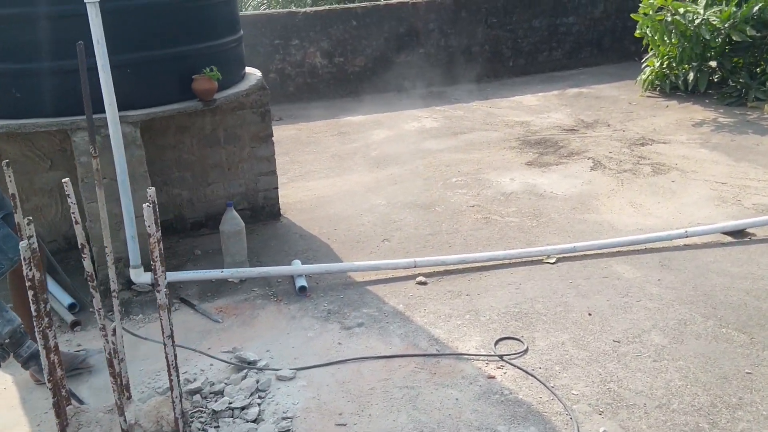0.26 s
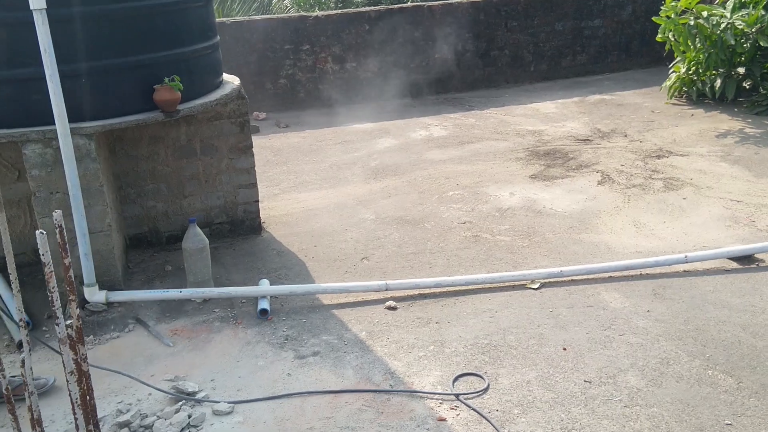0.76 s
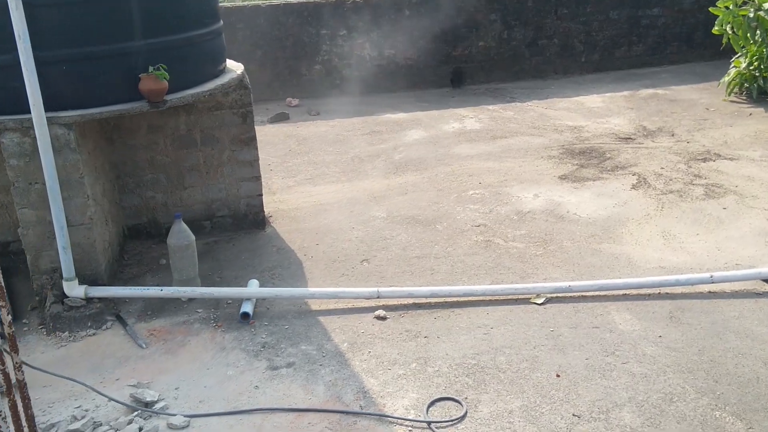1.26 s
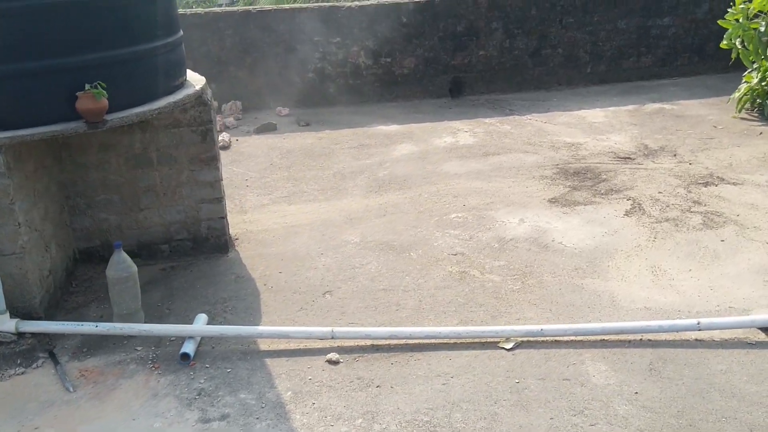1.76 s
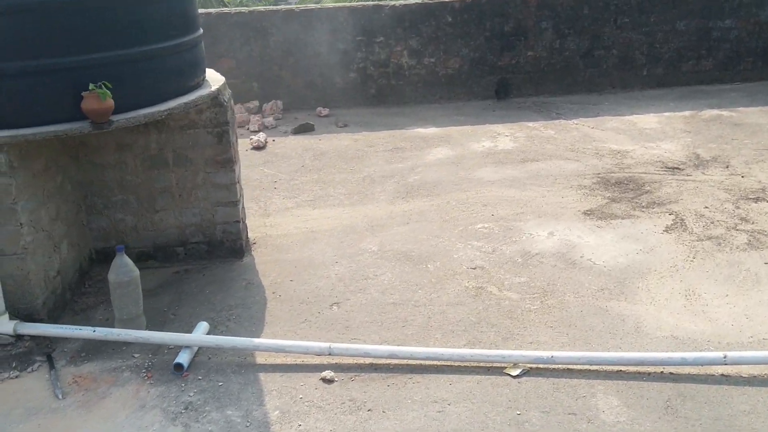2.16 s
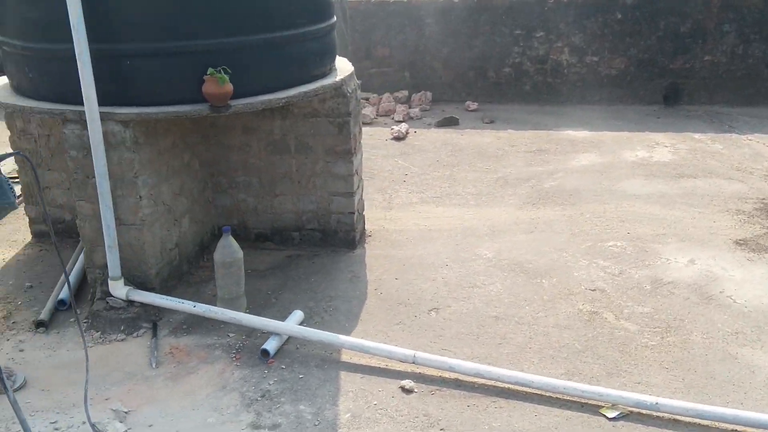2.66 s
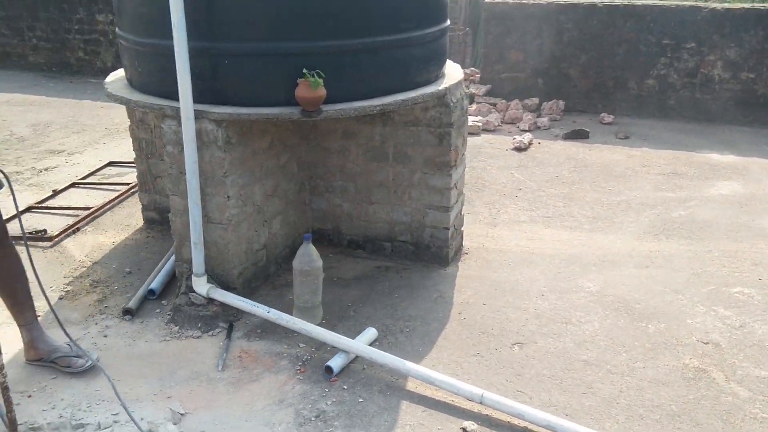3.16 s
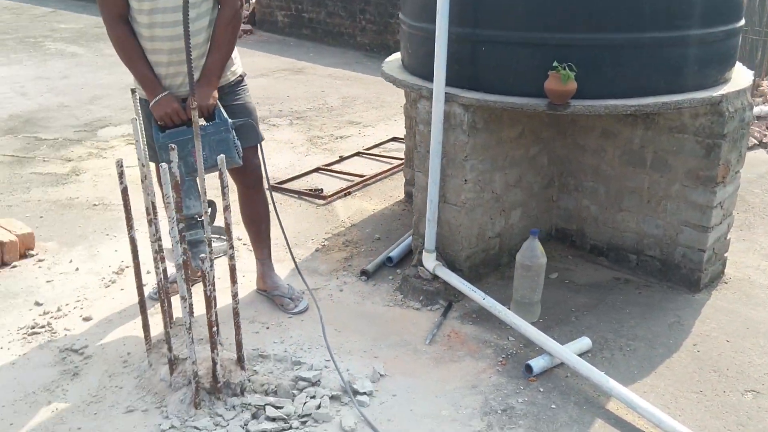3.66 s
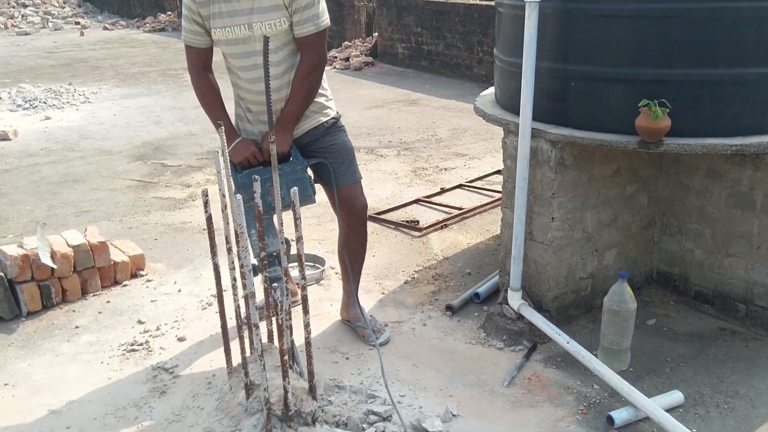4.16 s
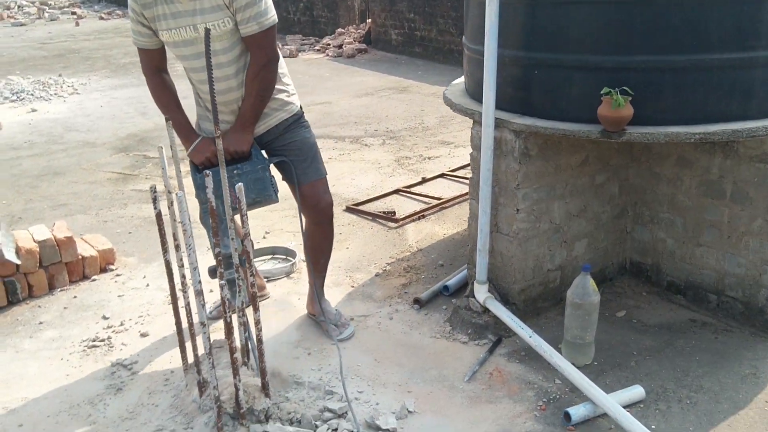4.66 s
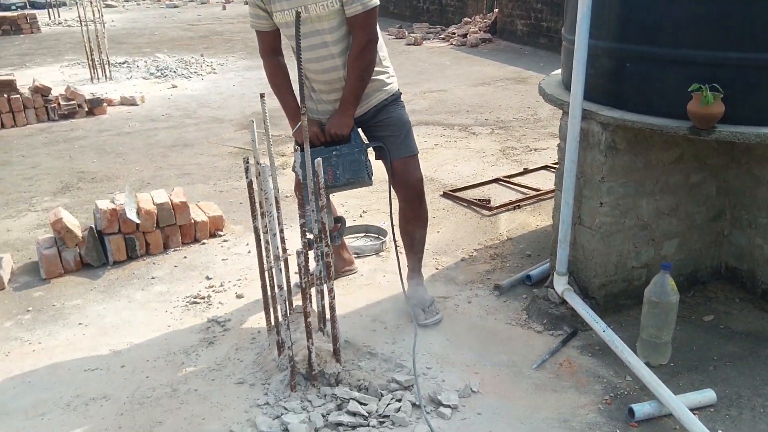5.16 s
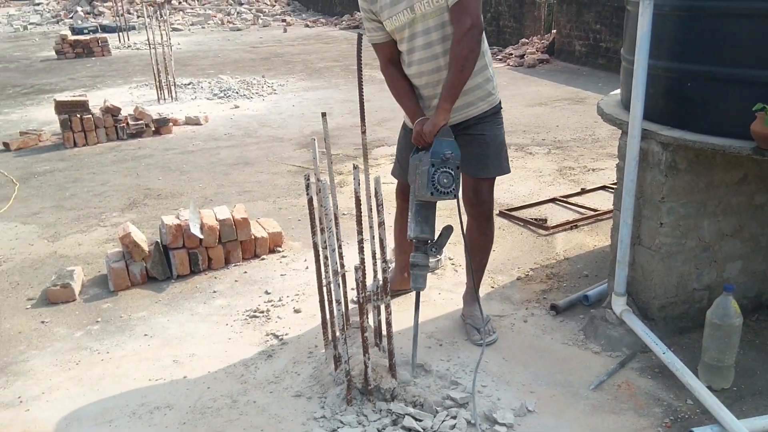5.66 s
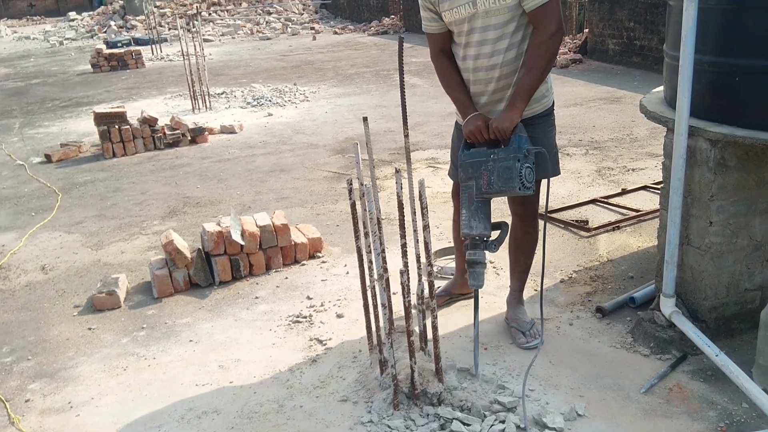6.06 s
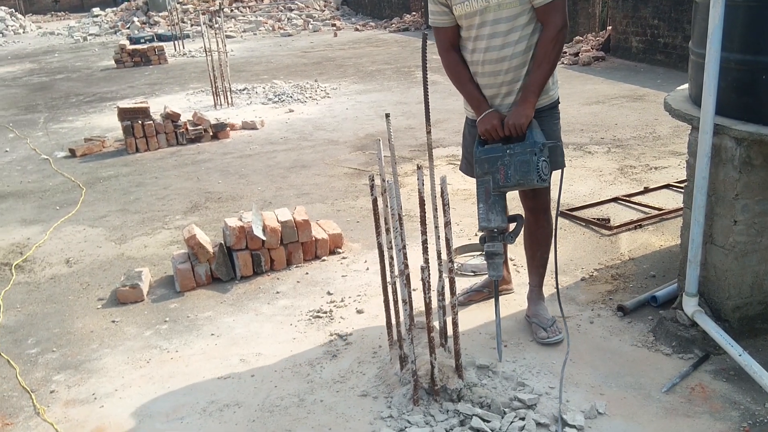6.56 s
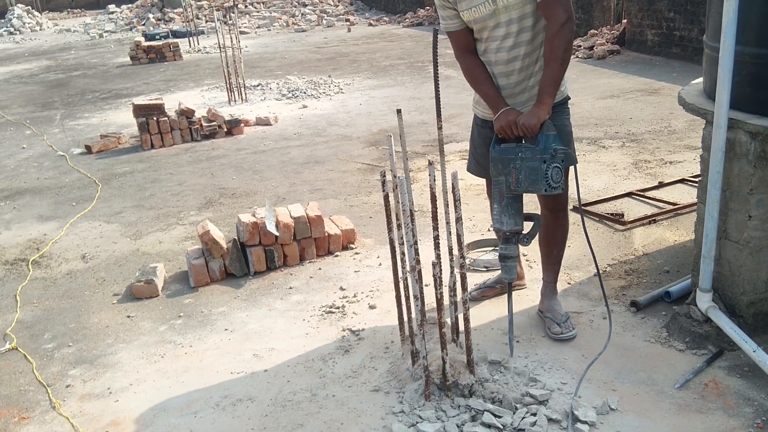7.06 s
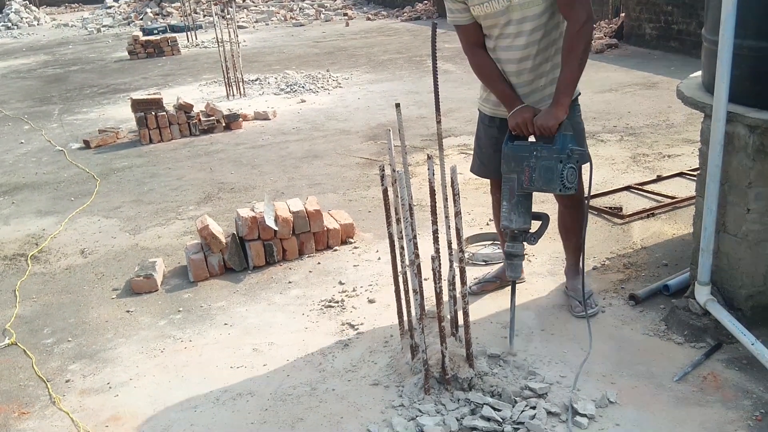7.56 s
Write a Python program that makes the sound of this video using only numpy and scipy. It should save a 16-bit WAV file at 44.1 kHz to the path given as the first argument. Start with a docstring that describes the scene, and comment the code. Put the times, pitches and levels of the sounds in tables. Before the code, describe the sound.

From 0 to 0.5 seconds an electric breaker runs unloaded on an open concrete roof: rough motor roar, gear chatter and wavering whine. At about 0.54 it starts pounding, roughly 31 blows a second, a loud, bright steel clatter with piercing chisel ring and low slab shudder. The texture shifts as the chisel bites or floats, some blows hard and dry, others soft with freer ringing, around 2.6 and 3.6 especially. Nearby surfaces add short, hard reflections. From about 4.5 the motor coasts: the gear whine sinks in pulses, blows slow and separate. By 6 they are distinct duller clacks with quick rebounds, and roar fades away. Short groans sink between 6.2 and 7.2 as knocks grow sparse. A low wind puff passes just after 7, a weak clack with a tiny rattle falls at 7.4, and a faint rough squeaky knock ends it at 7.8, over quiet distant site noise.

```python
"""Electric breaker on a concrete roof, switched off

A geared crank drives a striker against a steel chisel about 31 times a second, over motor roar and a shaking slab.
The motor coasts down: gear whine sinks through the housing resonances, blows thin out, slow teeth make it groan.
Noise, tuned resonances and decaying tones make the layers, over site noise; a puff of wind and a squeaky blow end it.
A parapet and a tank throw the machine's sound back, and the loudest peaks are squashed."""
import sys
import numpy as np
from scipy import signal
from scipy.fft import rfft, irfft, next_fast_len
from scipy.io import wavfile
from scipy.ndimage import uniform_filter1d

SR = 44100
rng = np.random.default_rng(int(sys.argv[2]) if len(sys.argv) > 2 else 0)


def generate_wav(signal):
    """Clip the signal to [-1, 1] and save it as 16-bit WAV at the path in sys.argv[1]."""
    frames = np.transpose(np.atleast_2d(signal))
    scaled = np.clip(frames, -1, 1) * 32767
    pcm = np.round(scaled).astype(np.int16)
    wavfile.write(sys.argv[1], SR, pcm)


N = 344421
PADDED = N + 4096  # room for filter tails
TIME, HZ = np.arange(N) / SR, np.fft.rfftfreq(PADDED, 1 / SR)
TURNS_PER_S, COAST_S, TEETH = 31, 4.54, 60  # nominal full speed, start of the coast, teeth per turn


def gain_of(db):
    """Decibels to an amplitude factor."""
    return 10 ** (np.asarray(db) / 20)


def read(points):
    """A spectrum table on the frequency axis, joined along log frequency."""
    hz, value = np.transpose(points)
    return np.interp(np.log(HZ + 1), np.log(hz + 1), value)


def coloured(x, points):
    """Filters by a spectrum whose mean power gain is one."""
    gain = gain_of(read(points))
    return irfft(rfft(x, PADDED) * gain / np.sqrt(np.mean(gain ** 2)), PADDED)[:N]


def resonance(x, hz, width):
    """Two-pole resonance of peak gain one."""
    return signal.lfilter(*signal.iirpeak(hz, hz / width, SR), x)


def band(x, low_hz, high_hz, order):
    """Butterworth band-pass."""
    return signal.sosfilt(signal.butter(order, [low_hz, high_hz], "band", fs=SR, output="sos"), x)


def smooth_noise(samples):
    """White noise averaged over a run of samples: a slow random wander."""
    return uniform_filter1d(rng.standard_normal(N), size=samples)


def smooth_patches(shape, bins, frames):
    """Random patches over time and frequency."""
    across = uniform_filter1d(rng.standard_normal(shape), size=bins, axis=0)
    return uniform_filter1d(across, size=frames, axis=1)


def patchy(x, spread_db, frames):
    """Colours a sound with drifting patches about 700 Hz wide."""
    z = signal.stft(x, SR, nperseg=256)[2]
    patches = smooth_patches(z.shape, 4, frames)
    gain = gain_of(spread_db * patches / patches.std())
    return signal.istft(z * gain / np.sqrt(np.mean(gain ** 2)), SR, nperseg=256)[1][:N]


def clicks(rows):
    """One impulse for each row, placed by its time in seconds and scaled by its level in dB."""
    rows, out = np.array(rows), np.zeros(N)
    np.add.at(out, np.round(rows[:, 0] * SR).astype(int), gain_of(rows[:, 1]))
    return out


def dying(x, t60):
    """Each impulse becomes a step that dies away by 60 dB in t60 seconds."""
    return signal.lfilter([1], [1, -1000 ** (-1 / (t60 * SR))], x)


def fuzzy(hz, width):
    """A wavering tone of rms one: noise through the same resonance twice."""
    x = resonance(resonance(rng.standard_normal(N), hz, width), hz, width)
    return x / x.std()


def fuzzy_phasor(hz, width):
    """A wavering tone as a complex signal, ready to be shifted in pitch."""
    return signal.hilbert(fuzzy(hz, width), next_fast_len(N))[:N]


def tones(rows, width, fall):
    """Short swelling tones that sink through their listed pitch by fall Hz a second."""
    out = 0
    for start, length, hz, db in rows:
        t = np.clip(TIME - start, 0, length)
        bend = np.exp(-1j * np.pi * fall * (t - length / 2) ** 2)
        swell = np.sin(np.pi * t / length)
        out = out + gain_of(db - 2.0) * swell * (fuzzy_phasor(hz, width) * bend).real
    return out


# The machine's fader moves. Each row: time in seconds, motor roar, gear whine and slab thud in relative dB,
# share of the gear load that comes from compressing air (0-1).
MACHINE = [(0, -10.5, -10.5, -76, 0.23), (.48, -11.5, -9.5, -55, 0.33), (.6, -12, -15.5, -33, 0.62),
           (1.07, -15, -17, -30, 0.73), (2.6, -15.5, -14.5, -31, 0.64), (4.55, -14.5, -12.5, -29.5, 0.68),
           (4.88, -16.5, -13, -33.5, 0.73), (5.18, -21, -21.5, -33.5, 0.5), (5.48, -22.5, -9.5, -33, 0.84),
           (5.8, -24.5, -18.5, -35.5, 0.5), (6.1, -29.5, -22.5, -39.5, 0.21), (6.3, -59.5, -19, -53, 0.71),
           (6.6, -63.5, -34.5, -54.5, 0.47), (6.9, -77.5, -39.5, -52.5, 0.77), (7, -65.5, -62, -72.5, 0.24),
           (7.4, -67, -68, -84, 0.17), (7.81, -74.5, -72, -62.5, 0.16)]


def control(column):
    """One column of the machine table, sample by sample."""
    points = np.array(MACHINE)
    return np.interp(TIME, points[:, 0], points[:, column])


STRIKE_TURN = .13  # crank angle at the start, in turns after a blow


def crank():
    """Crank angle in turns, whole at each coasting blow, and nominal speed in turns a second."""
    late, whines = np.array(COASTING)[:, 0], np.array(WHINES)
    first = round(late[0] * TURNS_PER_S + STRIKE_TURN)
    turns = np.interp(TIME, np.r_[0, late], np.r_[STRIKE_TURN, first + np.arange(len(late))])
    speed = np.interp(TIME, np.r_[COAST_S, whines[:, 0]], np.r_[TURNS_PER_S, whines[:, 1] / TEETH])
    return turns, speed


def halvings(speed):
    """How many times the speed has halved."""
    return np.log2(TURNS_PER_S / speed)


def hump(turns, at, sharp):
    """A swell once a turn, peaking at one."""
    return np.exp(sharp * (np.cos(2 * np.pi * (turns - at)) - 1))


IDLE_END_S, IDLE_FADE_S = .68, 0.086


def idle():
    """One while the motor runs unloaded, then a fade to zero."""
    return np.clip((IDLE_END_S - TIME) / IDLE_FADE_S, 0, 1)


# Noise colour of brushes, fan and bearings. Each row: frequency in Hz, relative density in dB per Hz.
ROAR = [(180, -27), (260, -4), (345, -6.5), (470, 2.5), (650, 0), (971, -1.5), (1820, 0), (2710, -7.5),
        (3710, 1), (5610, -3), (7300, -4), (12400, -17), (13500, -17), (15600, -27.5)]
TILT_DB, TILT_PER_HALVING_DB = 2, -3  # tilt per octave at full speed, and its change as the speed halves


def roar(turns, speed):
    """Broad motor noise, throbbing with the crank; its colour tilts about 3 kHz with speed."""
    noise = coloured(rng.standard_normal(N), ROAR)
    hz, t, z = signal.stft(noise, SR, nperseg=512)
    tilt = np.interp(t, TIME, TILT_DB + TILT_PER_HALVING_DB * halvings(speed))
    tilt_db = np.log2(np.maximum(hz, 900) / 3000)[:, None] * tilt
    wander_db = 29.1 * smooth_patches(z.shape, 3, 14)
    noise = signal.istft(z * gain_of(tilt_db + wander_db), SR, nperseg=512)[1][:N]
    throb = 0.8 + .5 * hump(turns, 0.9, 0.58)
    return gain_of(control(1) - 5.5) * throb * noise


# Fall of speed under each stroke and its spread, as shares of the speed.
STROKE_SAG, STROKE_SCATTER = 0.038, .008


def tooth_count(turns, speed):
    """Teeth passed so far; load slows the motor a little in each turn."""
    powered = TIME < COAST_S
    uneven = STROKE_SCATTER * rng.standard_normal(200)[turns.astype(int)] * powered
    shiver = .14 * smooth_noise(150)
    sag = 1 + .012 * idle() + .032 * powered + .008 - STROKE_SAG * hump(turns, 0.873, 2.1) + uneven + shiver
    return np.cumsum(TEETH * speed * sag) / SR


# Bursts of gear whine as the motor coasts, later several to a turn. Each row: middle in seconds, nominal mesh
# pitch in Hz, relative level in dB, rise from each mesh harmonic to the next in dB (pivoting on the second).
WHINES = [(4.574, 1790, 1.5, 12), (4.608, 1780, 5, 7), (4.645, 1750, 2, 0.5), (4.677, 1660, 3.5, 3.5),
          (4.714, 1580, 1, 4), (4.752, 1550, 3, 4.5), (4.79, 1530, -9.5, 13.5), (4.833, 1524, -3, -4),
          (4.875, 1470, -0.5, 0), (4.917, 1400, -3, 3.5), (4.963, 1330, 2, 11.5), (5.011, 1259, 2, 5),
          (5.057, 1270, 1, 7), (5.105, 1220, -30, 1), (5.156, 1164, 9.5, 3.5), (5.211, 1110, 5, 4.5),
          (5.272, 1040, 10, 3), (5.327, 995, 4.5, 0.5), (5.387, 950, -1, -5.5), (5.456, 890, 0.5, -1),
          (5.524, 836, -4.5, 6), (5.598, 762, -11, -0.5), (5.683, 711, -6, -2), (5.759, 683, 1.5, 3),
          (5.815, 635, -3, -3.5), (5.853, 592, -3, 13), (5.948, 597, 0.5, 11), (6.016, 567, -25, 1),
          (6.078, 594, -5.5, 18), (6.149, 484, 0, -2), (6.205, 450, -12, 0.5), (6.25, 445, 3, -5),
          (6.38, 422.5, -2, -3.5), (6.52, 403, -7, -3), (6.626, 359, -20, 17.5), (6.699, 322, 0.5, 3),
          (6.801, 290, -25, 8), (6.9, 259.3, -5, 7.5), (7.81, 150, -29.5, 2)]
WHINE_TURNS = 0.062  # spread (sigma) of a burst as a share of the turn
STROKE_SCATTER_DB = 2
HOUSING_LAG_S = .004  # the load leads each burst by this: the housing takes time to take it up


def strokes(turns):
    """Load on the teeth: a burst each turn under power, then the listed ones."""
    size = gain_of(STROKE_SCATTER_DB * rng.standard_normal(200))[turns.astype(int)]
    load = size * (hump(turns, 0.768, 5.5) + 0.096 * hump(turns, 0.59, 4.8)) * (TIME < COAST_S)
    for middle, hz, db, _ in WHINES:
        away = (TIME + HOUSING_LAG_S - middle) * hz / TEETH / WHINE_TURNS
        load = load + gain_of(db) * np.exp(-.5 * away ** 2)
    return load


# Tooth mesh harmonics, from the fundamental up: relative levels in dB.
MESH_DB = [2, -1, -4, -6.5, -26.5, -47]
IDLE_FUNDAMENTAL_DB, IDLE_SECOND_DB = 3, 11.5  # lift of the first two harmonics while unloaded


def mesh_whine(mesh):
    """Teeth meeting one after another sound a harmonic tone."""
    whines = np.array(WHINES)
    rise_db = np.interp(TIME, whines[:, 0], whines[:, 3], left=0)
    whine = 0
    for k, db in enumerate(MESH_DB, 1):
        idle_db = ((k == 1) * IDLE_FUNDAMENTAL_DB + (k == 2) * IDLE_SECOND_DB) * idle()
        whine = whine + gain_of(db + (k - 2) * rise_db + idle_db) * np.cos(2 * np.pi * k * mesh)
    return whine


IDLE_KNOCK_DB = -4.5  # unloaded, the knocking is weaker


def gear_chatter(speed):
    """Slack teeth knock at random over a grind; slow gears knock harder over less grind."""
    knocks = (rng.random(N) < 190 / SR) * gain_of(1.3 * rng.standard_normal(N) + IDLE_KNOCK_DB * idle())
    slack = (TURNS_PER_S / speed) ** .5
    rattling = dying(uniform_filter1d(knocks * slack, size=70), 0.014)
    return (0.22 / slack ** 2 + 2.45 * rattling) * patchy(rng.standard_normal(N), 3.7, 6)


# Resonances of the gear housing. Each row: frequency in Hz, width of each of two passes in Hz, level in dB.
HOUSING = [(447, 19, -20.5), (592, 50, -13), (790, 114, 5), (1257, 216, 7), (1524, 152, 8.5),
           (1770, 169, 6), (2343, 900, 1.5), (2940, 34, 0), (3702, 250, 2), (4800, 220, 6.5)]
SLOW_TREBLE_DB = -3  # change of the broad band and of resonances above 2 kHz per halving of the speed
IDLE_LOW_DB = -7.5  # the unloaded housing sounds less below 1 kHz


def gears(turns, speed, mesh, load):
    """The mesh whines while the piston compresses air and chatters between; the housing colours both."""
    squeeze, whine = np.clip(control(4), 0, 1), mesh_whine(mesh)
    chatter = (0.87 + hump(turns, 0.23, 0.94)) * gear_chatter(speed)
    drive = 1.09 * squeeze * load * whine + (1 - squeeze) * chatter
    treble = gain_of(SLOW_TREBLE_DB * halvings(speed))
    body = (0.044 + 0.092 * squeeze) * treble * band(drive, 700., 5100., 6)
    body = body + 0.45 * (TIME > COAST_S) * squeeze * load * band(whine, 600., 2300., 4)
    for hz, width, db in HOUSING:
        level = gain_of(db + IDLE_LOW_DB * idle() * (hz < 1e3)) * (treble if hz > 2e3 else 1)
        body = body + level * resonance(resonance(drive, hz, width), hz, width)
    return gain_of(control(2) + 0.5) * body


# Tones of the unloaded motor. Each row: pitch in Hz, width of each of two passes in Hz, level in dB.
IDLE_TONES = [(262, 23, -41.5), (476, 67, -34), (4590, 10, -32)]


def idle_tones():
    """Wavering tones of the unloaded motor, gone by the first blow."""
    fade = np.clip((FIRST_BLOW_S - TIME) / IDLE_FADE_S, 0, 1)
    return fade * sum(gain_of(db) * fuzzy(hz, width) for hz, width, db in IDLE_TONES)


# Colour of the distant site. Each row: frequency in Hz, relative density in dB per Hz.
AIR = [(25, -31.5), (60, -9.5), (190, -18), (400, -26), (600, -25), (1000, -38.5), (2500, -34.5),
       (4800, -36), (6000, -41), (9000, -50.5), (15500, -65.5)]
AIR_DB = -57


def site():
    """Distant site noise: steady noise, mostly low."""
    return gain_of(AIR_DB) * coloured(rng.standard_normal(N), AIR)


# Colour of the shaken slab. Each row: frequency in Hz, relative density in dB per Hz.
SLAB = [(15, -68), (25, -40.5), (93, -3), (124, -9.5), (160, -1), (186, -2.5), (210, -8), (240, 1),
        (333, -8), (450, -8.5), (580, -18.5), (990, -120)]
# How unevenly the slab is shaken. Each row: time in seconds, share from 0 steady to 1 lumpy.
UNEVEN = [(0, .8), (.95, .6), (1.05, .2), (2.1, .15), (2.2, 1), (2.5, .8), (2.6, .25), (3.05, .25),
          (3.15, .9), (4.15, .8), (4.3, .3), (4.6, .4), (4.8, 1)]
# Drift of a hum in the slab. Each row: time in seconds, pitch in Hz.
HUM = [(0, 530), (2.1, 530), (2.5, 548), (3.1, 545), (3.5, 532), (4.3, 556), (7.81, 540)]
HUM_WIDTH_HZ, HUM_DB = 14, -7  # waver, and level against the thud


def slab(turns):
    """Blow and recoil shake the slab twice a turn, steadily or in lumps, over a rumble and a drifting hum."""
    uneven = np.interp(TIME, *np.transpose(UNEVEN))
    half_turns = np.floor(2 * turns)
    beat = np.diff(half_turns, prepend=0) * (1 - 0.72 * (half_turns % 2))  # every other beat is weaker
    beat = beat * gain_of(60 * uneven * smooth_noise(300))
    shake = (36 - 12 * uneven) * beat + (0.81 + 0.41 * uneven) * rng.standard_normal(N)
    base_hz = HUM[0][1]
    drift_hz = np.interp(TIME, *np.transpose(HUM)) - base_hz
    drift = np.exp(2j * np.pi * np.cumsum(drift_hz) / SR)
    hum = (fuzzy_phasor(base_hz, HUM_WIDTH_HZ) * drift).real
    hum_fade = np.clip((COAST_S + .5 - TIME) / .5, 0, 1)
    return gain_of(control(3)) * (coloured(shake, SLAB) + gain_of(HUM_DB) * hum_fade * hum)


# Spells in which the chisel sits differently. Each row: middle in seconds, length in blows,
# pressure (0 normal, around -1 floating, 1 pressed home).
SPELLS = [(.541, 1, 0.62), (.641, 1, 0.11), (.72, 4, -0.22), (1.01, 2, -0.39), (1.093, 1, 0.42),
          (1.383, 1, 0.24), (1.445, 1, 0.077), (1.48, 1, 0.35), (1.609, 1, 0.16), (1.642, 1, -0.15),
          (1.787, 2, 0.067), (1.868, 1, 1), (1.963, 1, 0.35), (2.058, 1, 0.57), (2.191, 1, -0.86),
          (2.257, 3, 0.054), (2.387, 3, -0.12), (2.45, 1, 0.46), (2.61, 5, -1.17), (2.754, 2, 0.71),
          (2.818, 2, 0.047), (2.915, 2, 1), (2.995, 1, 0.5), (3.126, 3, 0.69), (3.206, 2, -0.64),
          (3.29, 1, 0.36), (3.385, 3, -0.65), (3.48, 3, 0.36), (3.608, 1, -1.6), (3.69, 4, 0.31),
          (3.95, 6, -0.44), (4.078, 2, 0.049), (4.142, 2, -0.13), (4.37, 10, 1)]
# Blows as the motor coasts down. Each row: time in seconds, crack in relative dB, chisel ring until the
# next blow in relative dB.
COASTING = [(4.547, -9, -12.5), (4.578, -26, -6.5), (4.6094, -17, -40), (4.6454, -33.5, -33.5),
            (4.6836, -11.5, -38.5), (4.7214, -10.5, -2.5), (4.7593, -11, -36), (4.805, -31.5, -43.5),
            (4.84, -9, -27), (4.881, -11, -16.5), (4.9314, -41.5, -38.5), (4.9695, -10, -13.5),
            (5.0149, -11, -4.5), (5.063, -14, -17), (5.1165, -40, -20), (5.165, -9, -2), (5.2188, -12, -37),
            (5.2763, -8.5, -49.5), (5.3388, -8.5, -13), (5.399, -9.5, -6.5), (5.465, -9, -42),
            (5.5348, -10, -9), (5.6079, -11.5, -30), (5.6896, -15, -5.5), (5.775, -10, -12),
            (5.8652, -11.5, -19.5), (5.9673, -10, -48), (6.0722, -14.5, -51.5), (6.1942, -19.5, -50),
            (6.329, -25, -52), (6.476, -21.5, -42), (6.6445, -22.5, -45), (6.8406, -25, -43.5),
            (7.079, -26.5, -46), (7.4002, -31, -50), (7.7874, -56, -65)]
FIRST_BLOW_S, BLOW_GAP_S, JITTER_S = .542, .0323, .0008  # under power the striker lands almost evenly
CRACK_DB, RING_DB, CRACK_SCATTER_DB, RING_SCATTER_DB = -14.5, -6, 1.75, 2
BITE_CRACK_DB, BITE_RING_DB = 3.5, -28.5  # change when pressed home: harder crack, damped ring
SLIP_CRACK_DB, SLIP_RING_DB = -20.5, 4  # change when floating: soft crack, free ring


def blows():
    """Rows of time, crack dB and ring dB: powered blows coloured by chisel pressure, then coasting ones."""
    s = np.arange(FIRST_BLOW_S, COAST_S - BLOW_GAP_S / 2, BLOW_GAP_S)
    pressure = sum(p * (abs(s - middle) < np.round(n) * BLOW_GAP_S / 2) for middle, n, p in SPELLS)
    bite, slip = np.maximum(pressure, 0), np.maximum(-pressure, 0)
    chance = rng.standard_normal((len(s), 3))
    crack_db = CRACK_DB + BITE_CRACK_DB * bite + SLIP_CRACK_DB * slip + CRACK_SCATTER_DB * chance[:, 0]
    ring_db = RING_DB + BITE_RING_DB * bite + SLIP_RING_DB * slip + RING_SCATTER_DB * chance[:, 1]
    return np.r_[np.c_[s + JITTER_S * chance[:, 2], crack_db, ring_db], COASTING]


# Rebounds of the chisel about 0.02 s after slow blows, then a soft rattle at the end. Each row: time in
# seconds, crack in relative dB.
REBOUNDS = [(5.7092, -33), (5.7932, -16.5), (5.8849, -18), (5.9853, -18.5), (6.0944, -17), (6.2109, -20.5),
            (6.3416, -20.5), (6.4911, -21.5), (6.6612, -22.5), (6.8567, -25), (7.0947, -28), (7.4163, -30),
            (7.444, -39.5), (7.455, -49), (7.466, -50.5), (7.478, -50)]
# Colour of the noise spray. Each row: frequency in Hz, relative density in dB per Hz.
CRACK = [(550, -48), (850, -4.5), (1700, 4.5), (2700, -3), (5000, -3), (6700, 3.5), (8500, 2.5),
         (10500, -4.5), (12500, -8), (13500, -18.5), (14500, -7.5), (15400, -14), (15700, -44)]
# What a blow rings in the barrel. Each row: frequency in Hz, relative level in dB, t60 in seconds before blur.
BARREL = [(1122, -4, 0.16), (1750, -10.5, 0.12), (2330, -12.5, 0.15), (2950, -4, 0.14), (3255, -5.5, 0.12),
          (3440, -5.5, 0.1), (4400, -7, 0.053), (4730, -24, 0.018), (6570, -4, 0.057), (7100, -13, 0.06),
          (7650, -5.5, 0.0075), (7960, -20, 0.049), (11200, -14.5, .03)]
BARREL_BLUR_HZ = 70  # the loose tool smears each ring
SLOW_BARREL_DB, SLOW_SPRAY_DB = 4.5, -2.5  # change of ring and spray per halving of the speed


def cracks(speed, struck):
    """Steel on steel: noise spray and a short barrel ring; slow blows are duller, ring more and rattle on."""
    hits = uniform_filter1d(clicks(struck) + clicks(REBOUNDS), size=240, origin=-100)  # loose parts spread 5 ms
    lumps = gain_of(32 * smooth_noise(70))  # they clatter unevenly
    slow = halvings(speed)
    rattle = 0.065 * slow * dying(hits, 0.24) * gain_of(82 * smooth_noise(300))
    decay = 0.59 * dying(hits, 0.066) + 1.49 * dying(hits, 0.031) + 0.055 * dying(hits, 0.28) + rattle
    burst = coloured(decay * lumps * patchy(rng.standard_normal(N), 3.94, 8), CRACK)
    dull = signal.sosfiltfilt(signal.butter(3, 9000., fs=SR, output="sos"), burst)
    spray = dull + (speed / TURNS_PER_S) ** 0.55 * (burst - dull)
    kick = gain_of(11.5) * dying(hits, 0.046) * lumps * rng.standard_normal(N)
    barrel = sum(gain_of(db) * resonance(kick, hz, 1.7 / t60 + BARREL_BLUR_HZ) for hz, db, t60 in BARREL)
    return gain_of(SLOW_SPRAY_DB * slow) * spray + gain_of(SLOW_BARREL_DB * slow) * barrel


# Lengthwise modes of the chisel: mean pitches in Hz.
CHISEL_HZ = [7030, 7267, 8146, 9480, 10500, 12150, 14208, 15150]
# The same modes. Each row: t60 in seconds, relative level in dB, pitch spread from blow to blow as a share.
CHISEL = [(0.13, -6.5, 0.0033), (0.12, -3.5, 0.0015), (0.053, -12.5, 0.0036), (0.1, -15, 0.004),
          (0.059, -22.5, 0.011), (0.069, -22, 0.014), (0.08, -21, 0.00096), (0.23, -31, 0.012)]
# Colour of the ring. Each row: time in seconds, tilt above the second mode in dB per octave, lowest mode in dB.
BRIGHT = [(0, 18.5, -11), (1.9, 12, -5), (2, 6.5, -4.5), (3.7, 8, -3), (3.9, 7.5, -1.5), (7.81, 3, 6.5)]
FLIGHT_S, LANDED_DB = .022, -7  # the chisel rings freely this long, then lands and is damped


def chisel(struck):
    """Lengthwise modes of the steel ring while the chisel flies free, and the next blow cuts them off."""
    s, _, ring_db = struck.T
    last = np.maximum(np.searchsorted(s, TIME) - 1, 0)
    since = np.maximum(TIME - s[last], 0)
    chance = rng.standard_normal((len(s), len(CHISEL), 3))[last]
    at, tilt, low = np.transpose(BRIGHT)
    tilt_db, low_db = np.interp(TIME, at, tilt), np.interp(TIME, at, low)
    ring = 0
    for k, (hz, (t60, db, spread)) in enumerate(zip(CHISEL_HZ, CHISEL)):
        shiver_db = 4.5 * chance[:, k, 0] + 45 * smooth_noise(130)
        colour_db = (k == 0) * low_db + tilt_db * max(np.log2(hz / CHISEL_HZ[1]), 0)
        level = gain_of(db + shiver_db + colour_db - 60 * since / t60)
        pitch = hz * (1 + spread * chance[:, k, 1])
        ring = ring + level * np.sin(2 * np.pi * pitch * since + 10 * chance[:, k, 2])
    landed_db = LANDED_DB * np.clip((since - FLIGHT_S) / .003, 0, 1)
    onset = 1 - np.exp(-since / .003)
    return gain_of(ring_db[last] + 1.5 + landed_db) * onset * ring


# Slow teeth sweep the low housing resonances. Each row: start and length in seconds, mid pitch in Hz,
# relative level in dB.
GROANS = [(6.17, 0.081, 444, -31), (6.3, 0.13, 419, -36.5), (6.48, 0.083, 806, -26), (6.6, 0.033, 770, -30),
          (6.88, 0.0685, 815, -39), (7.135, 0.059, 800, -34), (7.185, 0.036, 746, -43)]


def groans():
    """The housing groans: wavering tones that swell and sink."""
    return tones(GROANS, width=34.2, fall=270)


# A low puff of wind on the microphone. Each row: time in seconds, relative level in dB.
GUST = [(7, -77), (7.025, -38.5), (7.06, -48), (7.332, -50.5), (7.4, -76)]


def wind_puff():
    """Low noise that swells briefly."""
    gust_db = np.interp(TIME, *np.transpose(GUST), left=-99, right=-99)
    colour = [(20, -20.5), (60, 2.5), (130, 2.5), (260, -23.5), (1000, -67.5)]  # (Hz, dB per Hz)
    return gain_of(gust_db) * coloured(rng.standard_normal(N), colour)


# Two faint ticks, then a rough squeaky last blow at 7.785 s. Each row: start and length in seconds,
# pitch in Hz, relative level in dB.
LAST_BLOW = [(7.712, .014, 4350, -63), (7.752, 0.032, 4400, -51), (7.752, .028, 5400, -63),
             (7.785, .04, 4400, -35), (7.785, 0.048, 1995, -41), (7.785, .04, 2924, -41.5),
             (7.785, 0.05, 5580, -39.5)]


def squeaky_last_blow():
    """Wide wavering tones at steady mean pitch, together a rough squeak."""
    return tones(LAST_BLOW, width=199.0, fall=0)


def roof(x):
    """Sparse reflections of random sign from parapet and tank, dying by 60 dB in 0.1 s."""
    taps = np.zeros(SR // 2)
    at = np.arange(300, len(taps) - 20, 20) + rng.integers(0, 20, (len(taps) - 301) // 20)
    taps[at] = rng.choice([-1., 1.], len(at)) * gain_of(-60 * at / SR / 0.1)
    return x + gain_of(-9.0) * signal.oaconvolve(x, taps / np.linalg.norm(taps))[:N]


# Stereo width. Each row: frequency in Hz, left-right likeness (0-1).
ALIKE = [(40, .5), (300, .85), (700, .65), (1500, .55), (4000, .5), (15000, .5)]
# Stereo balance. Each row: frequency in Hz, lean of left over right in dB.
LEAN = [(60, -3), (130, -1.5), (290, -5), (640, -3), (1410, -8), (3100, -0.5), (6820, -4), (15000, 6.5)]
# Stereo phase of the shared part. Each row: frequency in Hz, lead of left in radians.
LEAD = [(20, .3), (500, 0.11), (1200, 0.58), (3000, 1.76), (8000, 1.53), (15000, 1.6)]


def scene():
    """Two renderings of all layers, blended so that the microphones hear them only partly alike."""
    turns, speed = crank()
    mesh, struck, load = tooth_count(turns, speed), blows(), strokes(turns)

    def rendering():
        """Spectrum of one draw of every layer; only the machine above the slab is thrown back."""
        machine = roar(turns, speed) + gears(turns, speed, mesh, load) + idle_tones()
        machine = machine + cracks(speed, struck) + chisel(struck) + groans()
        return rfft(roof(machine) + site() + slab(turns) + wind_puff() + squeaky_last_blow(), PADDED)

    a, b = rendering(), rendering()
    alike, lean = np.clip(read(ALIKE), 0, 1), gain_of(read(LEAN) / 2)
    right = alike * np.exp(-1j * read(LEAD)) * a + np.sqrt(1 - alike ** 2) * b
    return gain_of(-1.5) * irfft(np.array([a * lean, right / lean]), PADDED)[:, :N]


EDGE_HZ = 15750


def record(dry):
    """Peaks are squashed smoothly towards full scale; then a steep low-pass limits the band."""
    squashed = dry / (1 + abs(dry) ** 4) ** .25
    low_pass = signal.firwin(511, EDGE_HZ, window=("kaiser", 9), fs=SR)
    return signal.oaconvolve(squashed, low_pass[None], "same")


dry = scene()
out = record(dry)
generate_wav(out)
```